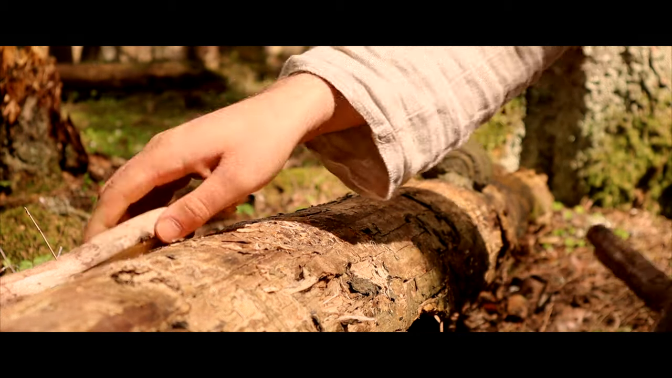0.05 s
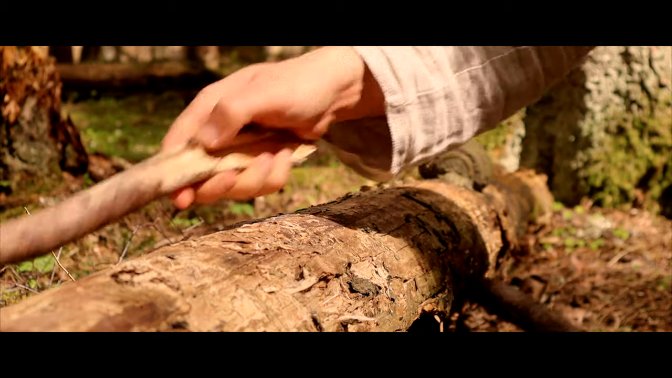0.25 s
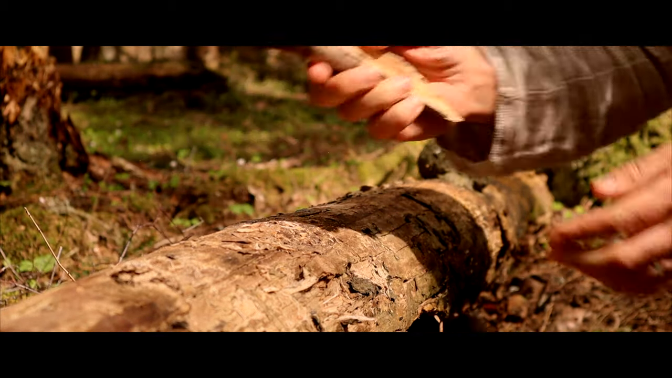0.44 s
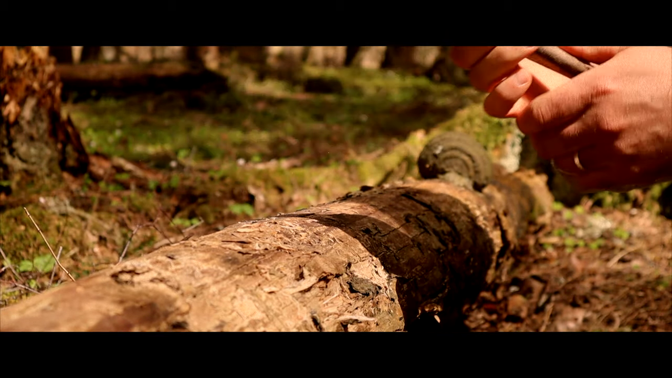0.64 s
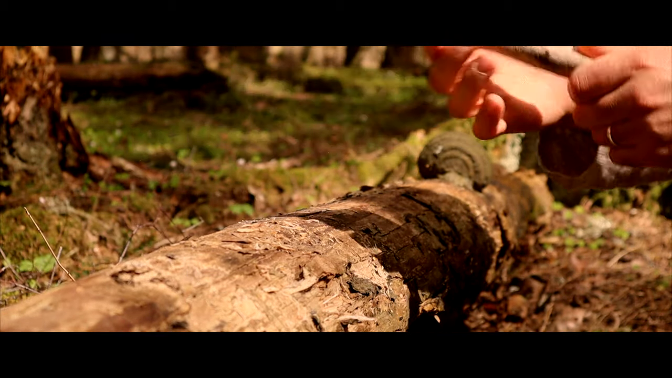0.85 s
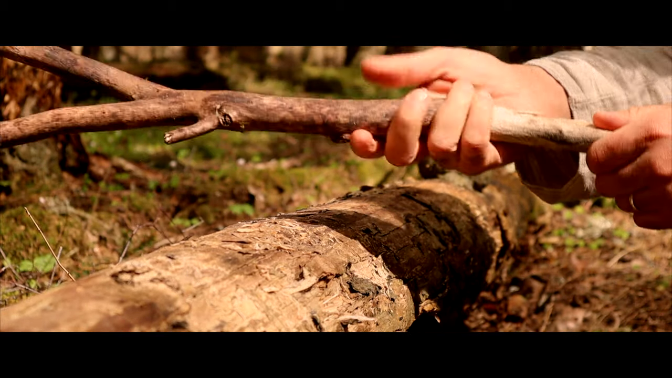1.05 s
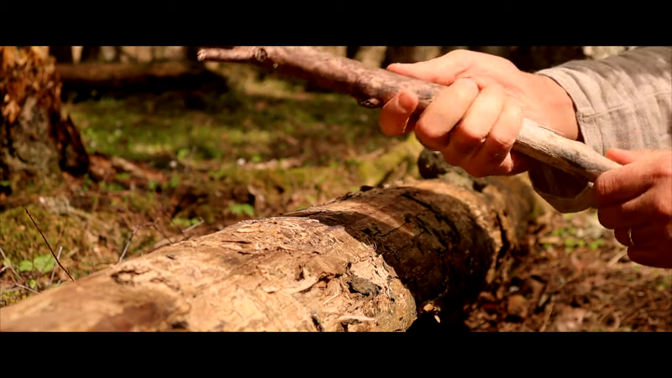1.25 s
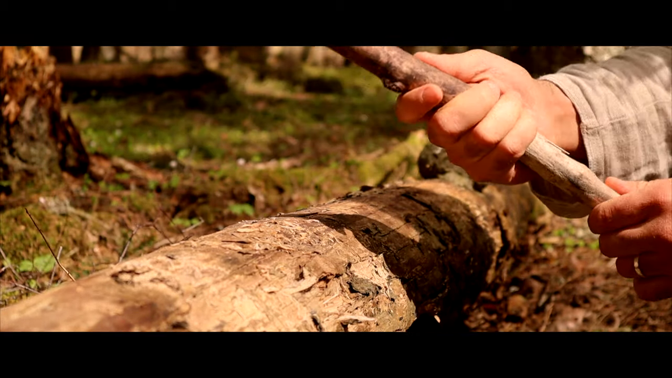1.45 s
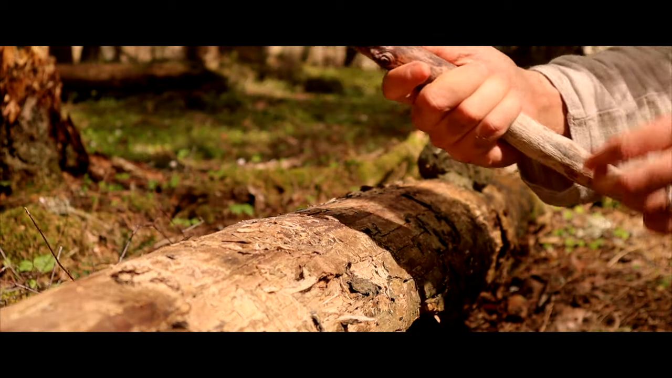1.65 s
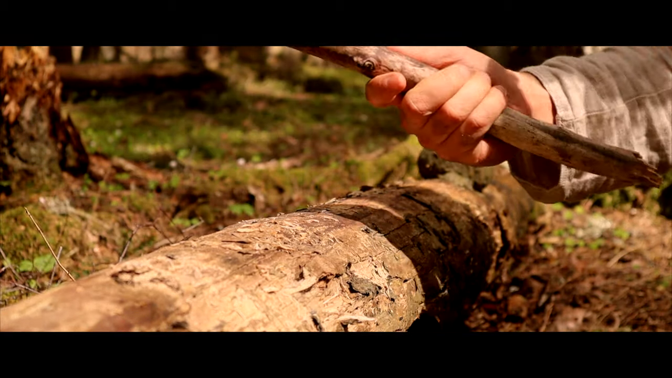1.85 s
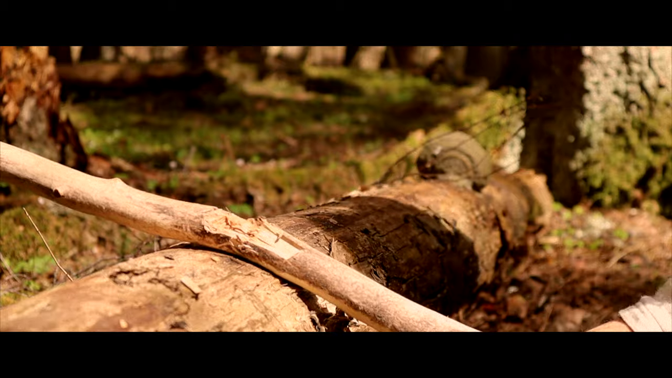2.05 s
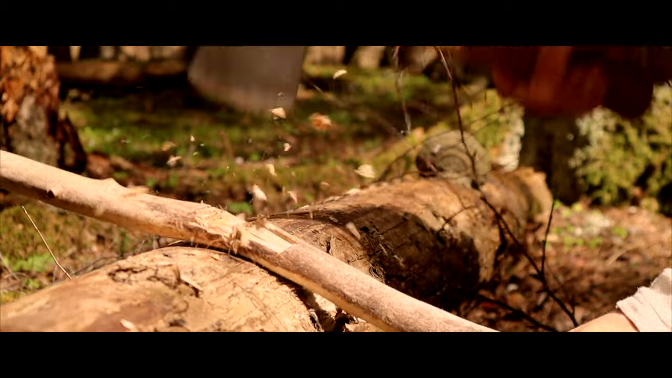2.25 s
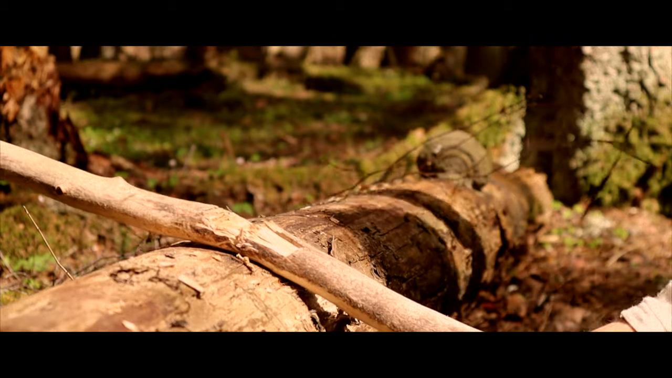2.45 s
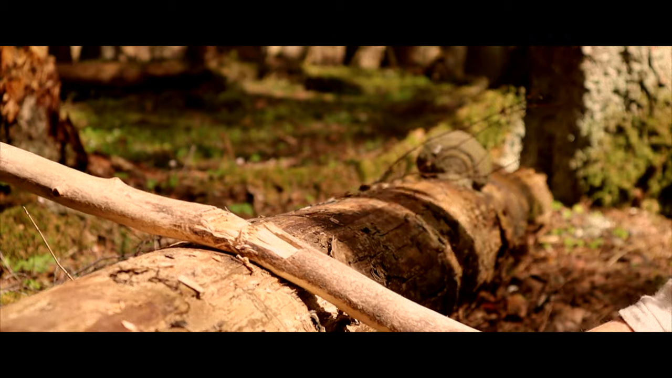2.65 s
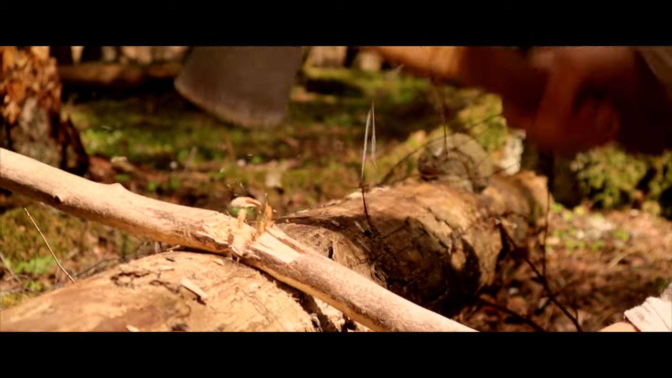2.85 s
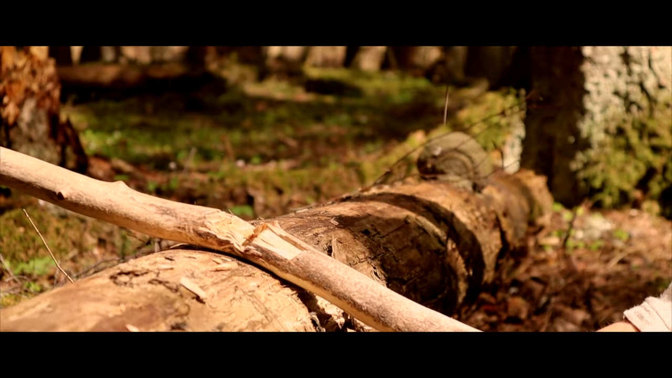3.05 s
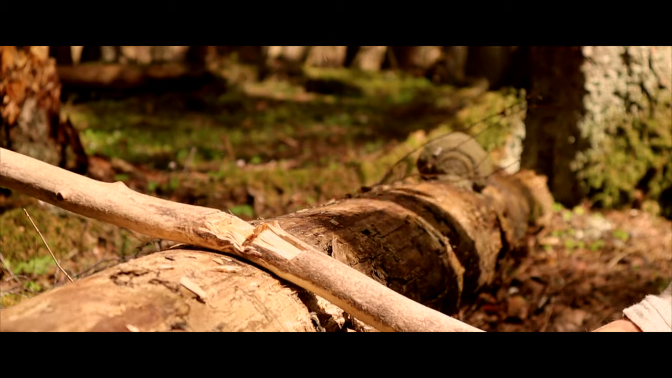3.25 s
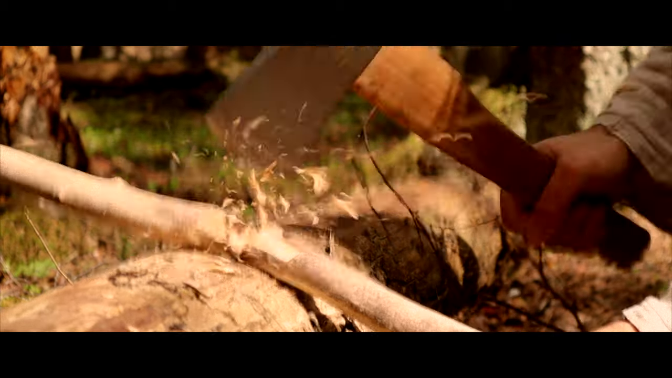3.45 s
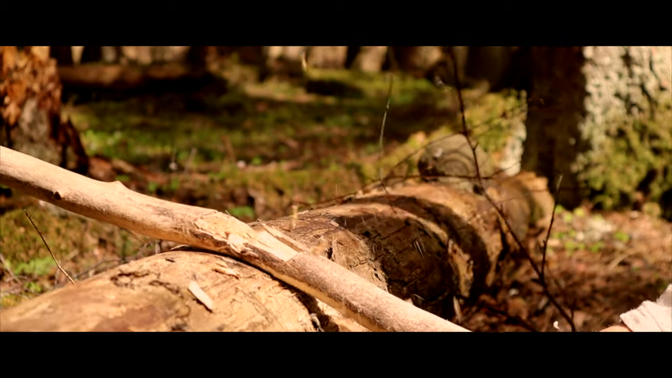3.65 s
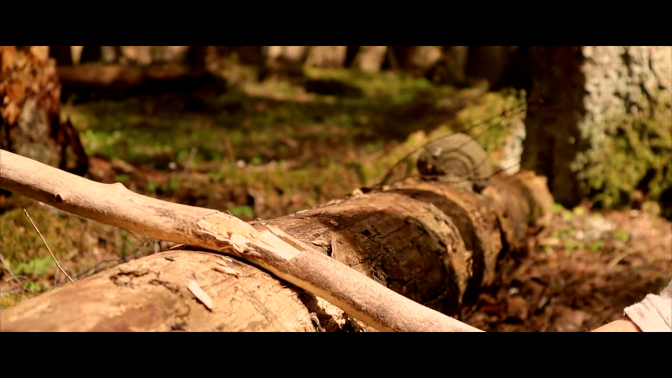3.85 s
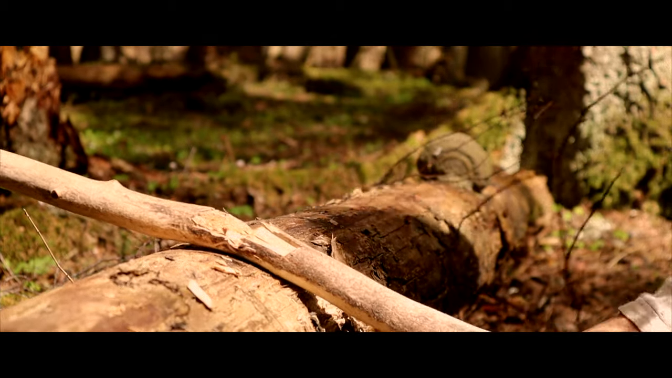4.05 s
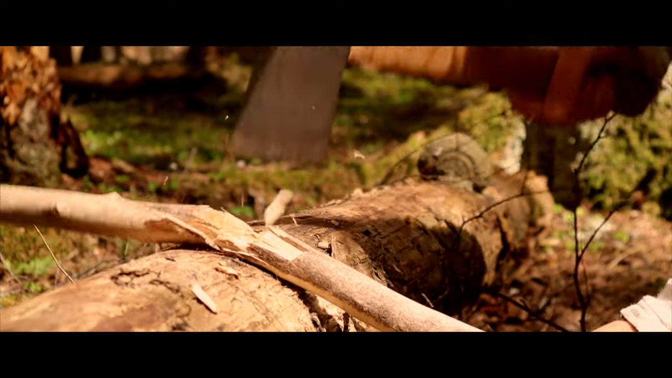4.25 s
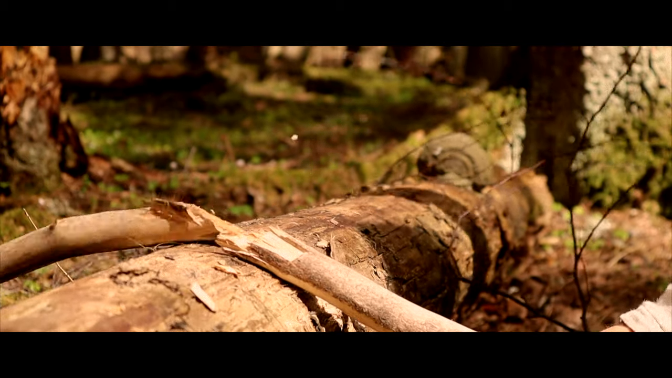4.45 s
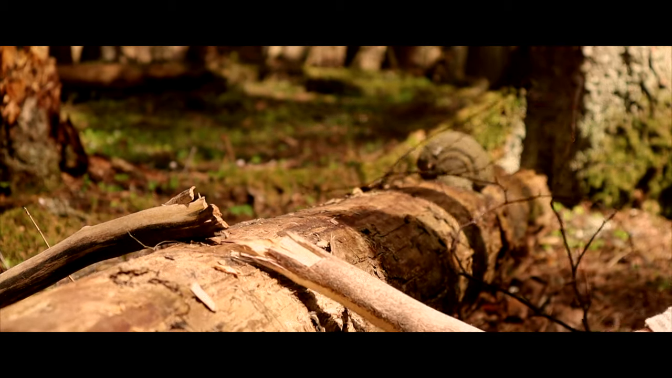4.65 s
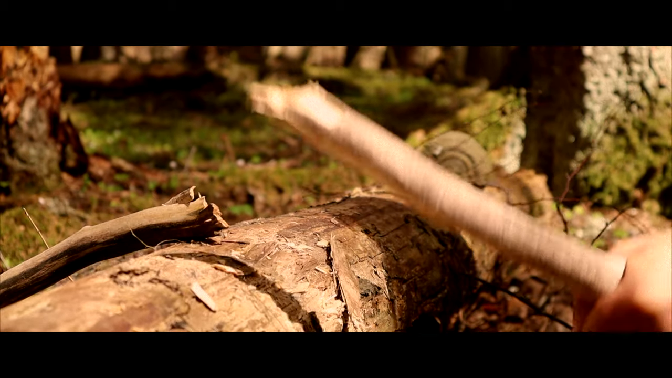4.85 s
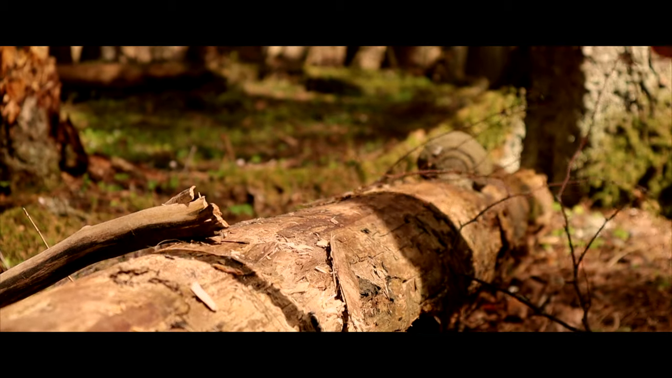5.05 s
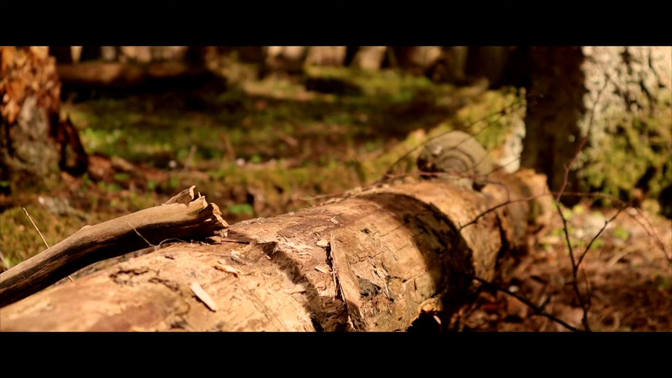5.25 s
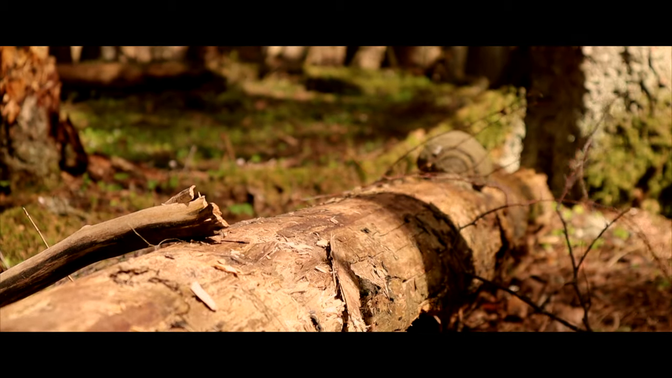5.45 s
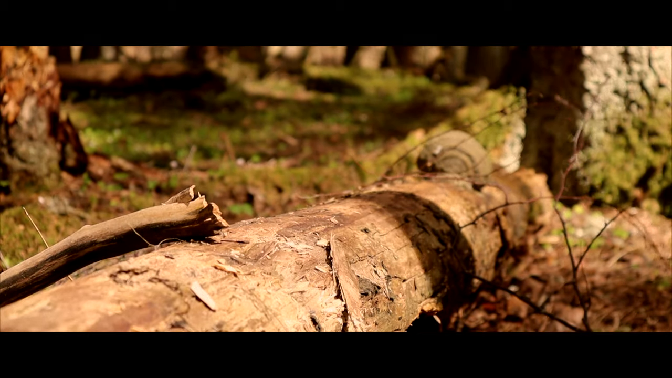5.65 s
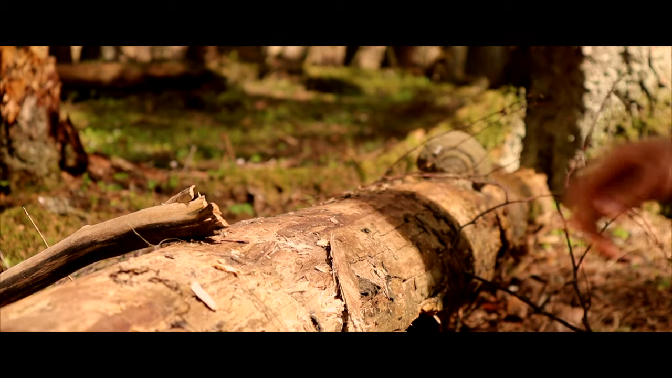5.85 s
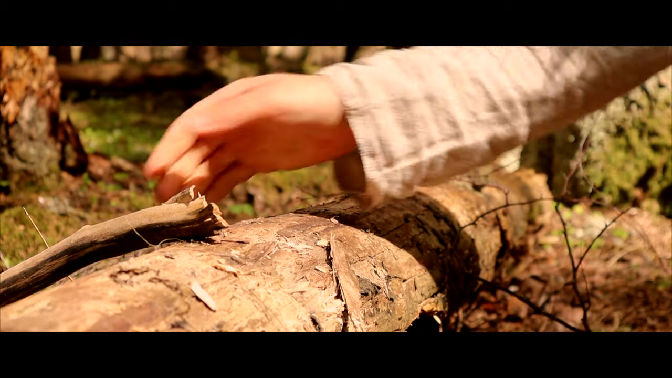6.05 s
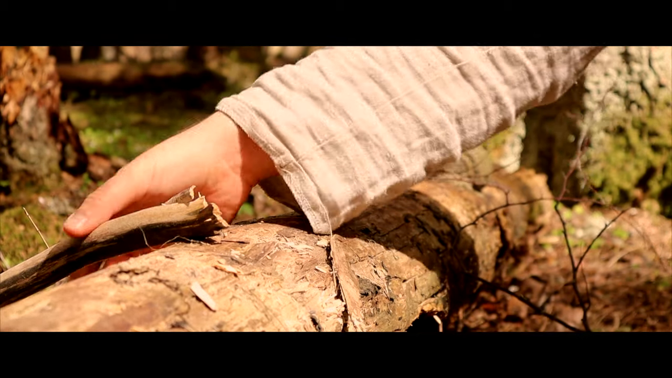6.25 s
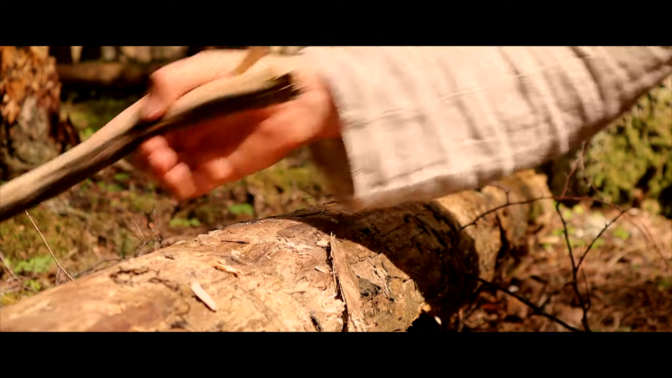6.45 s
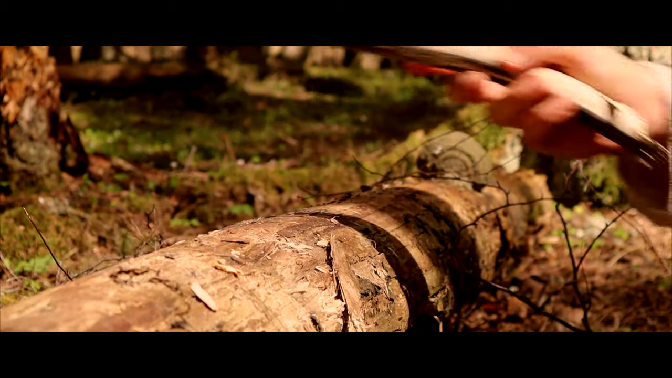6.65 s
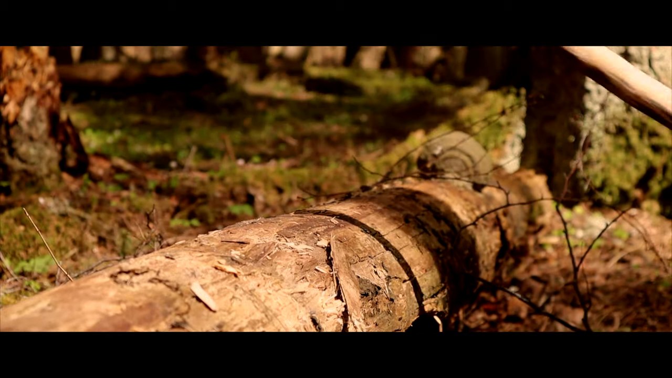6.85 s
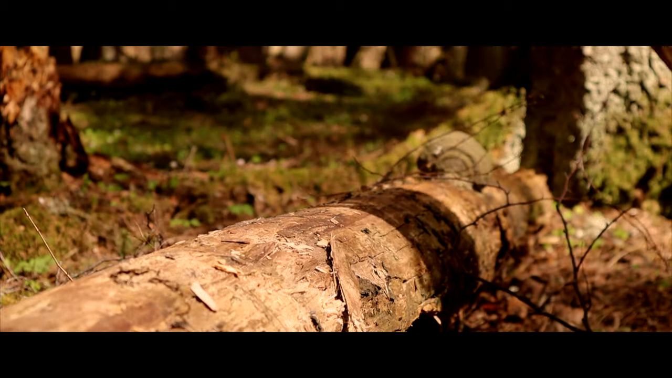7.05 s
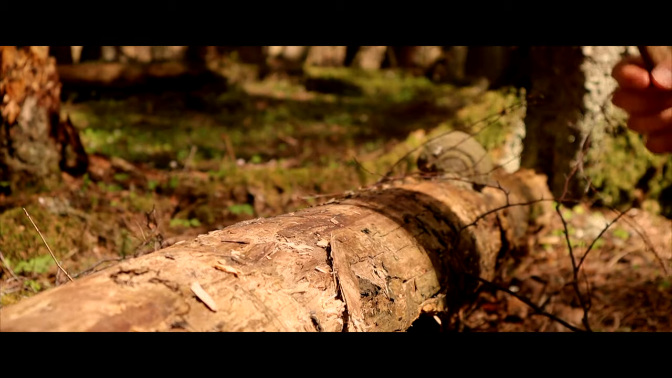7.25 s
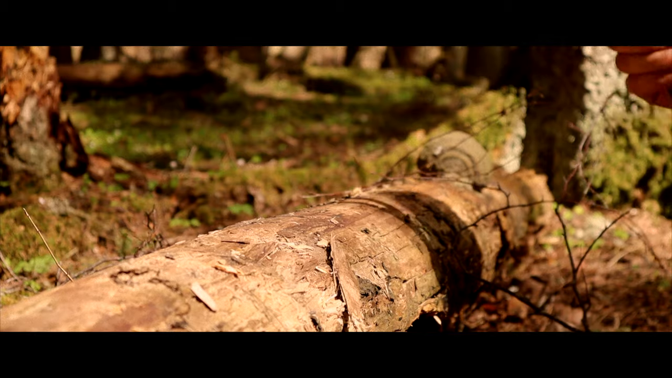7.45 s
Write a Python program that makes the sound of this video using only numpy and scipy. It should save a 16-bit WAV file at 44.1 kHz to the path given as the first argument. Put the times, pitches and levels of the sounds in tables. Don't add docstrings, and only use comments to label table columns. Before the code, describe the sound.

Four hard, evenly paced axe chops crack into a dry branch on a log, chips pattering, then the axe drops on forest soil.

```python
import sys
import numpy as np
from scipy import signal
from scipy.fft import rfft, irfft
from scipy.io import wavfile

SR = 44100
rng = np.random.default_rng(int(sys.argv[2]) if len(sys.argv) > 2 else 0)


def ratio_of_db(decibels):
    return 10 ** (np.asarray(decibels, float) / 20)


def inscribe(sig):
    pcm = np.round(np.clip(np.atleast_2d(sig).T, -1, 1) * 32767)
    wavfile.write(sys.argv[1], SR, pcm.astype(np.int16))


N = 331191
STEP = 64

# pitch in Hz, level in dB per Hz.
TREE_HUSH = [(30, -15), (100, 2.5), (250, -6.5), (600, 0), (1050, -5.5), (2200, -18.5), (2950, -17),
             (3250, -17), (3600, -17), (4300, -21), (5500, -30), (9000, -29.5), (15000, -38.5)]
# time in seconds, rumble in dB.
WIND = [(0, -71), (.35, -60), (.65, -77), (1.86, -72.5), (1.95, -44), (2.1, -52), (4.08, -58.5), (4.8, -53),
        (5.05, -63.5), (5.17, -49.5), (5.45, -69.5), (5.65, -58), (6.3, -56), (6.45, -53), (7.0, -46),
        (7.2, -50.5), (7.33, -54.5), (7.51, -56)]
# middle in seconds, half width in seconds, level in dB.
LEANS = [
    (.33, 0.32, -59.5),
    (1.97, 0.11, -61),
    (5.67, 0.23, -59),
    (7.33, 0.1, -67),
]
# pitch in Hz, level in dB per Hz.
RUB_COLOUR = [(300, -12.5), (800, -6), (1500, -4), (2700, -3.5), (4000, -6), (6000, -14.5)]
# start in seconds, length in seconds, dull part in dB,
# bright part in dB.
RUBS = [(0.026, 0.045, -47, -56.5), (0.149, 0.13, -51, -59.5), (0.303, 0.0047, -52, -45),
        (0.316, 0.15, -50.5, -61.5), (0.462, 0.06, -47.5, -50), (0.587, 0.021, -47.5, -50),
        (0.667, .016, -54, -62), (.72, 0.041, -59, -63.5), (0.89, 0.067, -69, -66), (1.1, 0.042, -74, -72),
        (4.364, 0.012, -48.5, -57.5), (4.406, 0.023, -50.5, -55.5), (4.464, 0.091, -62.5, -64),
        (4.57, 0.011, -53, -69), (4.624, 0.028, -57.5, -59), (4.865, .08, -59, -73.5),
        (4.951, 0.066, -50, -59), (5.048, 0.034, -48.5, -58.5), (5.112, 0.04, -48.5, -59),
        (5.606, .02, -52.5, -71), (5.89, 0.017, -61, -80), (5.975, 0.081, -55.5, -67),
        (6.096, 0.025, -54, -62), (6.238, 0.079, -54.5, -61), (5.7, 0.17, -68.5, -82),
        (7.476, 0.0201, -54.5, -63), (6.97, 0.0034, -56, -59), (7.231, 0.042, -55.5, -64),
        (7.319, 0.022, -48, -53), (7.39, 0.024, -58.5, -62), (2.884, .014, -52, -51), (3.5, .08, -54, -64),
        (3.935, .06, -57, -63), (4.18, .07, -53, -72), (6.225, .03, -53, -62), (6.3, .045, -60, -60),
        (6.82, .04, -62, -63)]
# end in seconds, rise in dB per
# second, dull part in dB, bright part in dB.
SLIDES = [
    (6.445, 352, -51, -57),
    (6.868, 170, -55, -61),
    (6.77, 39, -82, -70.5),
]
DEBRIS_DB = (-4.0, 1.5, 1.5, 0.5)
# time in seconds, peak in dB, ringing pitch in Hz,
# bright peak in dB.
TICKS = [(0.0672, -33, 3400, -47), (0.3075, -25.5, 1870, -45), (0.4608, -36, 3430, -59),
         (0.5989, -41, 2960, -43.5), (0.6658, -42.5, 2880, -44), (2.082, -36.5, 2370, -54),
         (2.115, -24, 3300, -50.5), (2.173, -25, 1030, -36), (2.211, -38, 1010, -56),
         (2.2787, -33, 1350, -62.5), (2.7706, -16.5, 3190, -29), (2.7805, -21, 2980, -31),
         (2.8271, -30, 1020, -45), (2.9203, -39.5, 3250, -43.5), (3.4095, -28, 2020, -31.5),
         (3.466, -22.5, 1450, -38), (3.4738, -21, 1050, -28.5), (3.527, -33, 1000, -45.5),
         (3.7887, -37, 2000, -68), (3.888, -37, 1830, -70), (3.9447, -34.5, 1970, -61),
         (4.038, -40.5, 3500, -51.5), (4.0812, -29.5, 2150, -34.5), (4.1465, -36.5, 1790, -50.5),
         (4.6156, -40, 1980, -45), (5.137, -35, 3230, -50.5), (5.5677, -24.5, 3105, -71),
         (5.5943, -29.5, 4530, -38), (6.445, -40, 2855, -62), (7.328, -40.5, 4180, -38)]
# time in seconds, bright peak in dB.
FLAKES_AND_CRUMBS = [(1.9196, -49), (1.9545, -54), (1.9927, -53), (2.0631, -51.5), (2.1524, -36), (2.1573, -37),
                     (2.1831, -41.5), (2.3152, -48.5), (2.4635, -51), (2.5192, -51.5), (2.577, -47), (2.5932, -49),
                     (2.6893, -50.5), (2.8352, -47.5), (2.8927, -50), (2.9144, -47.5), (3.0847, -45), (3.2204, -47),
                     (3.2708, -52.5), (3.5153, -46), (3.5421, -41.5), (3.5554, -46), (3.6479, -52), (3.7692, -42),
                     (3.8267, -51), (3.8622, -42.5), (3.9154, -39), (3.9239, -31), (4.0949, -44), (4.4169, -40),
                     (0.4993, -40), (0.5069, -42.5), (0.5938, -43), (1.1275, -55.5), (1.5162, -59), (4.4392, -39.5),
          (4.6255, -43.5), (5.0735, -44.5), (5.1584, -44), (5.6039, -48), (6.0245, -51), (6.3219, -48.5),
          (6.3359, -44.5), (6.432, -51), (6.4399, -52), (6.7733, -51.5), (6.9627, -40.5), (7.2109, -52.5),
          (7.3402, -45.5), (7.411, -53.5), (7.4776, -45)]
# time in seconds, peak in dB, pitch in Hz, seconds to fade
# by 60 dB.
KNOCKS = [(0.161, -36.5, 426, 0.05), (0.251, -37, 180, 0.021), (0.419, -34.5, 260, 0.023),
          (0.591, -44.5, 228, 0.056), (2.388, -33.5, 147, 0.043), (2.462, -31.5, 134, 0.024),
          (2.507, -38, 212, 0.047), (3.039, -31.5, 145, 0.038), (3.158, -41, 218, 0.048),
          (3.677, -37.5, 145, 0.045), (3.752, -33.5, 135, 0.034), (4.078, -32.5, 815, 0.023),
          (4.498, -46, 210, 0.034), (5.582, -31.5, 172, 0.073), (5.65, -25, 236, 0.02),
          (5.716, -42.5, 172, 0.041), (5.768, -44.5, 203, 0.037), (5.598, -35, 250, .02),
          (3.485, -33, 480, .025), (3.511, -36, 520, .02), (3.523, -36, 500, .02), (3.553, -35, 500, .025),
          (7.31, -46, 400, .04), (4.75, -48, 230, .04), (5.893, -37, 190, 0.047)]
# time in seconds, level in dB, ringing pitch in Hz, length in seconds,
# share of ringing (no unit).
CRUNCHES = [(0.304, -39, 1800, 0.018, 0.44), (2.118, -47, 1210, 0.027, .3),
            (2.772, -41.5, 2440, 0.036, 0.19), (3.411, -44, 2056, 0.011, 0.72),
            (3.924, -48, 1150, 0.018, 0.33), (4.4022, -29, 500, 0.0068, 0.56),
            (4.4015, -41.5, 2300, 0.009, 1.5), (4.415, -34.5, 1110, 0.0046, 0.23),
            (4.434, -48, 2850, 0.02, 0.25), (4.613, -50, 1940, 0.023, 3.5), (4.616, -50, 2880, 0.014, 2.1),
            (5.554, -30.5, 1050, 0.026, 0.33), (5.649, -45, 600, 0.017, 1.5), (6.424, -55, 3100, .03, 1.14),
            (2.93, -42.5, 1500, 0.012, 0.1), (4.26, -47.5, 1380, 0.015, .2),
            (1.803, -58.5, 1500, 0.0054, .3), (6.109, -46.5, 1317, 0.022, 0.57),
            (6.111, -54.5, 740, 0.025, 2.9), (6.959, -45.5, 2010, 0.0072, .1)]
# time in seconds, length in seconds, first pitch in Hz, last pitch in
# Hz, level in dB.
CHIRPS = [
    (1.52, .025, 4170, 3580, -62),
    (1.727, 0.013, 4440, 3600, -63),
    (1.738, .012, 3570, 4400, -66),
    (6.16, 0.0185, 4620, 3500, -59),
    (7.159, 0.03, 5000, 3730, -62.5),
]
# time in seconds, pitch in Hz, level in dB.
BIRD_VOICES = [
    [(5.71, 8320, -120), (5.73, 8180, -72), (5.76, 8400, -76.5), (5.78, 9620, -75.5), (5.797, 8900, -78.5),
     (5.828, 10000, -90.5), (5.875, 8340, -84), (5.92, 9230, -76), (5.97, 9150, -120)],
    [(5.71, 6580, -120), (5.75, 6630, -77), (5.77, 6800, -78), (5.805, 8240, -74), (5.83, 7860, -79.5),
     (5.855, 6730, -77.5), (5.907, 7960, -76.5), (5.95, 7470, -80), (5.97, 7360, -120)],
]
# time in seconds, pitch in Hz, level in dB.
WHISTLES = [
    [(2.036, 1750, -90), (2.043, 1850, -58), (2.055, 2910, -62), (2.068, 3350, -59), (2.09, 3100, -60),
     (2.11, 2700, -62), (2.118, 2500, -90)],
    [(1.98, 3400, -90), (1.99, 3220, -59), (2.005, 2800, -66), (2.015, 2600, -90)],
    [(1.565, 2980, -95), (1.59, 2800, -67), (1.615, 2450, -71), (1.645, 2040, -72), (1.66, 1950, -95)],
    [(1.745, 4300, -95), (1.76, 4750, -74), (1.8, 4850, -77), (1.815, 4800, -95)],
    [(1.805, 3800, -95), (1.82, 3550, -71), (1.84, 2800, -71), (1.855, 2550, -95)],
    [(1.6, 3450, -95), (1.618, 3350, -62), (1.635, 3250, -74), (1.657, 3300, -65), (1.68, 3400, -70),
     (1.7, 3350, -95)],
]
# time in seconds, force in dB, wood pitch factor (no unit), splinters in dB, rebound
# delay in seconds.
CHOPS = [
    (2.1653, 2.5, 1.08, -11.5, .0085),
    (2.8164, 1.5, 1.0, -5.5, .011),
    (3.4555, 1.5, .97, -7, .0185),
    (4.1563, 0.5, 1.01, -10, .009),
]
# bite in seconds, three branch tones in dB, dB, dB, dying sound
# in dB.
GRIPS = [
    (.00085, 0, 0, 6, 0),
    (.0008, -8, 1.5, 12, 1.5),
    (.00095, 0, -2, 9, 0),
    (.001, 9, -7, -8, 0),
]
# four high tones in dB, dB, dB, dB, the log in dB.
EDGES = [
    (0, 0, 0, 0, 0),
    (0, -5, 2, -2, 4),
    (0, 2, 7, 4, 0),
    (3, 5, 0, 2, -1),
]
ADJUSTED_TONES = (2, 3, 4, 5, 6, 7, 8, 1)
# pitch in Hz, level in dB, seconds to fade by 60 dB.
WOOD_TONES = [(192, -19, .12), (246, -8, 0.043), (500, -14.5, 0.016), (660, 0, 0.0081), (876, -19.5, 0.018),
              (1180, -14, .015), (1550, -18, .02), (2350, -15.5, 0.018), (3250, -13, .015)]
# pitch in Hz, level in dB per Hz.
TEAR_COLOUR = [(530, -24.5), (900, -5.5), (1620, -7.5), (3470, -8), (6110, -15.5), (6720, -14.5),
               (13500, -25.5), (16000, -30)]
# pitch in Hz, level in dB per band, seconds to fade by 60 dB.
DYING_BANDS = [(43.6, -30, 0.97), (125, -39, 0.9), (228, -28, 0.33), (480, -27, 0.14), (965, -34.5, 0.052),
               (1900, -42, .15), (3400, -47, .3), (7600, -56, 0.12)]
# delay in seconds, level in dB, pitch in Hz, seconds
# to fade by 60 dB.
THUMPS = [
    (.017, -23, 175, .05),
    (.048, -25, 85, .12),
    (.066, -30, 160, .05),
    (.124, -27, 75, .12),
]
# time in seconds, peak in dB, pitch in Hz, seconds to fade
# by 60 dB.
PINGS = [(3.4097, -18.5, 2020, 0.018), (3.4097, -22.5, 3600, .012), (3.417, -40.5, 3720, .03),
         (2.2105, -33, 1000, .012), (2.264, -38.5, 1300, .012), (5.557, -30, 2500, .02),
         (2.919, -40, 3160, .015), (2.963, -44.5, 900, 0.017), (3.122, -46.5, 1700, .015),
         (4.2667, -42, 1500, .012), (4.8635, -50, 3300, .012), (4.897, -47.5, 3400, .012),
         (4.907, -48, 2500, .012), (4.924, -51, 9800, .006), (4.931, -49, 5800, .008),
         (5.056, -42, 3100, 0.021), (5.064, -45, 2480, .015), (5.07, -44, 3400, .015),
         (5.092, -43, 2400, .015), (5.113, -43, 2320, 0.016), (5.121, -42, 3100, .015),
         (5.146, -41, 3500, .012), (5.209, -53.5, 3000, .01), (5.22, -53.5, 3400, .01),
         (5.653, -41.5, 2200, .02), (6.2133, -51, 3080, .012), (6.2262, -50, 2880, .015),
         (6.2366, -46, 2840, .02), (6.2446, -47, 2980, .02), (6.4013, -49, 2780, .012),
         (6.8281, -51, 2460, .015), (6.845, -50, 2900, .015), (7.1381, -52.5, 3710, .012),
         (7.2095, -45, 2920, .015), (7.2308, -48.5, 3100, .015), (7.3157, -42, 2790, .015),
         (7.357, -40.5, 3340, 0.013), (7.3895, -51.5, 3360, .012), (7.4633, -46.5, 2920, .012)]
# time in seconds, peak in dB.
SPECKS = [(2.8873, -35), (2.8964, -34), (2.9394, -44), (2.9614, -43), (3.7683, -31), (3.8054, -39),
          (3.8472, -41), (3.895, -33), (3.9504, -43), (3.9744, -44), (6.3274, -36), (6.3494, -48),
          (6.4078, -38), (7.1382, -48), (7.23, -42), (7.3567, -35), (7.3674, -37), (7.4629, -39)]
# time in seconds, level in dB.
LANDINGS = [
    (5.5559, -27.5),
    (5.5571, -19),
    (5.569, -37),
]
# pitch in Hz, level in dB, seconds to fade by 60 dB.
AXE_TONES = [(600, -17, 0.03), (920, -9, 0.05), (1384, -15, 0.07), (1750, -18, .07), (1950, 0, 0.03),
             (3198, -11, 0.11), (3230, -22.5, 0.23), (4510, -36.5, 0.3)]
# time in seconds, level in dB, pitch in Hz, seconds to fade by 60 dB.
HANDLE_HUM = (5.566, -41, 477, .55)


def in_time(rows):
    s, *columns = np.transpose(rows)
    return [np.interp(np.arange(N) / SR, s, column) for column in columns]


def bandpass(x, low_hz, high_hz, order=2):
    sos = signal.butter(order, [low_hz, min(high_hz, .45 * SR)], "band", fs=SR, output="sos")
    return signal.sosfilt(sos, x)


def band(x, low_hz, high_hz, order=2):
    y = bandpass(x, low_hz, high_hz, order)
    return y / np.std(y)


def coloured(white, points):
    hz = np.maximum(np.fft.rfftfreq(len(white), 1 / SR), 1)
    table_hz, table_db = np.transpose(points)
    gain = ratio_of_db(np.interp(np.log(hz), np.log(table_hz), table_db))
    y = irfft(rfft(white) * gain, len(white))
    return y / np.std(y)


def drift(rate):
    knots_per_s = 400
    knots = rng.standard_normal(int(N / SR * knots_per_s))
    r = np.exp(-2 * np.pi * rate / knots_per_s)
    slow = signal.lfilter([1], [1, -2 * r, r * r], np.tile(knots, 2))[len(knots):]
    return np.interp(np.arange(N) / SR * knots_per_s, np.arange(len(slow)), slow / np.std(slow))


def ring(hz, t60, size):
    t = np.arange(size) / SR
    return np.sin(2 * np.pi * hz * t) * ratio_of_db(-60 * t / max(t60, .002))


def glide(hz):
    return np.sin(2 * np.pi * np.cumsum(hz) / SR)


def add(out, s, sound):
    i = round(s * SR)
    out[i:i + len(sound)] += sound[:N - i]


def swell(start_s, end_s, db, rise_db_s, fall_db_s):
    t = np.arange(0, N, STEP) / SR
    before = rise_db_s * np.maximum(start_s - t, 0)
    after = fall_db_s * np.maximum(t - end_s, 0)
    return ratio_of_db(db - before - after) ** 2


def hump(middle_s, width_s, db):
    t = np.arange(0, N, STEP) / SR
    return ratio_of_db(db) ** 2 * np.exp(-4 * ((t - middle_s) / width_s) ** 2)


def level_db(power):
    return np.interp(np.arange(N) / STEP, np.arange(len(power)), 10 * np.log10(power + 1e-14))


def heaves():
    return sum(hump(chop[0] + .36, 0.23, 0) for chop in CHOPS)


def forest_hush():
    return ratio_of_db(-64.0 + 0.65 * drift(2.8)) * coloured(rng.standard_normal(N), TREE_HUSH)


def chorus():
    voices = [glide(hz + 110 * drift(45)) * ratio_of_db(4.5 * drift(30)) for hz in (2880, 2970, 3450, 3550)]
    return ratio_of_db(-79.5 - .8 * np.arange(N) / SR) * sum(voices)


def rumble():
    wind = ratio_of_db(in_time(WIND)[0][::STEP]) ** 2
    loudness_db = level_db(wind + ratio_of_db(-50) ** 2 * heaves())
    return band(rng.standard_normal(N), 23, 70) * ratio_of_db(loudness_db + 1.5 * drift(8.4) - 2.5)


def creak():
    leaning = sum(hump(*row) for row in LEANS)
    loudness_db = level_db(ratio_of_db(-75) ** 2 + ratio_of_db(-53.5) ** 2 * heaves() + leaning)
    return band(rng.standard_normal(N), 100, 300) * ratio_of_db(loudness_db + 3 * drift(15))


def crackle(rub_db, low_hz, high_hz):
    pops_per_s, ring_cycles = 90, 13
    happens = rng.random(N) < pops_per_s / SR
    height = ratio_of_db(3.2 * np.minimum(rng.exponential(1, N), 3))
    pops = happens * height * ratio_of_db(rub_db + 3.5)
    dealt = rng.integers(0, 6, N)
    out = np.zeros(N)
    for k, hz in enumerate(np.geomspace(low_hz, high_hz, 6)):
        out += signal.oaconvolve(pops * (dealt == k), ring(hz, ring_cycles / hz, 300))[:N]
    return out


def rubbing():
    shapes = []
    for s, length_s, _, _ in RUBS:
        rise_db_s = 25.5 / (length_s + 0.019)
        shapes.append(swell(s, s + length_s, 0, rise_db_s, 0.65 * rise_db_s))
    for s, rise_db_s, _, _ in SLIDES:
        shapes.append(swell(s, s, 0, rise_db_s, 2470))
    levels_db = np.array(RUBS + SLIDES)[:, 2:].T
    dull_rubs, bright_rubs = ratio_of_db(levels_db) ** 2 @ np.array(shapes)
    work = swell(1.92, 4.7, 0, 980, 300) * ratio_of_db(4.0 * drift(12)[::STEP])
    debris = sum(swell(chop[0], chop[0], -52 + db, 3000, 41.5) for chop, db in zip(CHOPS, DEBRIS_DB))
    still_db = -69.5
    dull_db = level_db(ratio_of_db(still_db) ** 2 + ratio_of_db(-61) ** 2 * work + debris + dull_rubs)
    bright_db = level_db(ratio_of_db(-83.5) ** 2 + ratio_of_db(-69) ** 2 * work + ratio_of_db(-14.5) ** 2 * debris + bright_rubs)
    clumps = 1.8 * drift(40)
    grains = rng.standard_normal(N) * ratio_of_db(1.8 * rng.exponential(1, N))
    dull = coloured(grains, RUB_COLOUR + [(9000, -36.0)])
    dull *= ratio_of_db(dull_db + clumps + 2.1 * drift(60) - 5.5)
    bright = band(grains, 4100, 13000) * ratio_of_db(bright_db + clumps + 1.8 * drift(60) - 3.5)
    active_db = np.where(dull_db > still_db + 2, dull_db, -120)
    pops = crackle(active_db, 1900, 4700) + crackle(bright_db + 0.5, 5000, 10500)
    return dull + bright + pops


def ticks():
    out, t = np.zeros(N), np.arange(900) / SR
    small = FLAKES_AND_CRUMBS
    pieces = list(TICKS)
    for (s, db), (a, b) in zip(small, rng.standard_normal((len(small), 2))):
        pieces.append((s, db - 1.5 + 3 * a, 3300 * np.exp(.12 * b), db))
    sprays = rng.standard_normal((len(pieces), len(t))) * ratio_of_db(-60 * t / 0.011)
    tops = bandpass(sprays, 5500, 13000)
    mids = bandpass(sprays, 900, 4500)
    for (s, db, hz, top_db), top, mid in zip(pieces, tops, mids):
        body = ring(hz, 0.0097, len(t)) + 1.8 * mid
        add(out, s + .0001, ratio_of_db(db - 2.5) * body + ratio_of_db(top_db + 6) * top)
    return out


def knocks():
    out = np.zeros(N)
    for s, db, hz, t60 in KNOCKS:
        overtone = ring(2.42 * hz, 0.46 * t60, 4400)
        add(out, s + 0.0046, ratio_of_db(db - 2) * (ring(hz, t60, 4400) + 0.65 * overtone))
    return out


def crunches():
    out, t = np.zeros(N), np.arange(3000) / SR
    size = (len(CRUNCHES), len(t))
    cracks = rng.standard_normal(size) * ratio_of_db(2.5 * rng.exponential(1, size))
    for (s, db, hz, length_s, tone), row in zip(CRUNCHES, cracks):
        fade = np.exp(-.7 * t / length_s) / (1 + (t / length_s) ** 2.8)
        row = row * fade * np.minimum(t / 0.00083, 1)
        low = np.clip(1 - hz / 3800, 0, 1)
        broad = low * band(row, 320, 1500) + (1 - low) * band(row, 1600, 3600, order=3)
        piece = np.convolve(row, ring(hz, .025, len(t)))[:len(t)]
        add(out, s, ratio_of_db(db - 9) * (broad + tone * piece / np.std(piece)))
    return out


def birds():
    out = np.zeros(N)
    for s, length_s, from_hz, to_hz, db in CHIRPS:
        hz = np.linspace(from_hz, to_hz, round(length_s * SR))
        add(out, s, ratio_of_db(db) * np.hanning(len(hz)) * glide(hz))
    for rows in BIRD_VOICES:
        hz, db = in_time(rows)
        out += ratio_of_db(db + 3 * drift(40)) * glide(hz)
    return out


def whistles():
    out, flutter = np.zeros(N), ratio_of_db(3.0 * drift(50) - 2.5)
    for rows in WHISTLES:
        s, hz, db = np.transpose(rows)
        t = np.arange(s[0], s[-1], 1 / SR)
        add(out, s[0], ratio_of_db(np.interp(t, s, db)) * glide(np.interp(t, s, hz)))
    return out * flutter


def bites():
    out, t = np.zeros(N), np.arange(SR // 2) / SR
    for (s, force_db, *_), (bite_s, *_) in zip(CHOPS, GRIPS):
        add(out, s - .0006, ratio_of_db(-10.0) * np.linspace(0, 1, 26) ** 2.0)
        push = np.sin(np.pi * np.minimum(t / bite_s, 1)) ** .7
        add(out, s, -ratio_of_db(force_db + 1.5) * push)
    return out


def struck_wood():
    out, size = np.zeros(N), SR // 2
    contact = signal.windows.hann(13) / 6
    for (s, force_db, pitch, _, rebound_s), (bite_s, *branch_db, _), edge_db in zip(CHOPS, GRIPS, EDGES):
        extra_db = dict(zip(ADJUSTED_TONES, [*branch_db, *edge_db]))
        for k, (hz, db, t60) in enumerate(WOOD_TONES):
            tone = np.convolve(ratio_of_db(db + extra_db.get(k, 0)) * ring(hz * pitch, t60, size), contact)
            lead_s = 0.00012 if hz < 350 else 0
            add(out, s + bite_s - lead_s, ratio_of_db(force_db) * tone)
            add(out, s + rebound_s, ratio_of_db(-15.5) * tone)
    return out


def tearing():
    out, t = np.zeros(N), np.arange(SR // 2) / SR
    fibres = coloured(rng.standard_normal(N) * ratio_of_db(3.0 * rng.exponential(1, N)), TEAR_COLOUR)
    for s, _, _, tear_db, _ in CHOPS:
        i = round(s * SR)
        length_s = 0.0037 + .0002 * (tear_db + 8.5)
        shape = np.minimum(t / 0.00058, 1) / (1 + (t / length_s) ** 4.3)
        add(out, s, ratio_of_db(tear_db - 3.5) * shape * fibres[i:i + len(t)])
    return out


def dying_wood():
    out, t = np.zeros(N), np.arange(SR // 2) / SR
    hums = [band(rng.standard_normal(N), hz / 1.41, hz * 1.3) for hz, _, _ in DYING_BANDS]
    rattle = ratio_of_db(1.5 * drift(22))
    hop = ratio_of_db(-53) * np.exp(-((t - .113) / .022) ** 2)
    for (s, *_), (*_, tail_db) in zip(CHOPS, GRIPS):
        here = slice(round(s * SR), round(s * SR) + len(t))
        tail = hop * rattle[here] * (hums[3] + hums[4])[here]
        for hum, (hz, db, t60) in zip(hums, DYING_BANDS):
            build_up = np.minimum(t * hz / 2.4, 1) ** 3
            tail += hum[here] * ratio_of_db(db - 60 * t / t60) * build_up
        add(out, s, np.minimum(t / .004, 1) * rattle[here] * ratio_of_db(tail_db) * tail)
    return out


def thumps():
    out, soft = np.zeros(N), signal.windows.hann(200) / 100
    for (s, force_db, *_), chance in zip(CHOPS, rng.standard_normal((len(CHOPS), len(THUMPS)))):
        for (delay_s, db, hz, t60), c in zip(THUMPS, chance):
            thump = np.convolve(ring(hz * (1 + .04 * c), t60, 9000), soft)
            add(out, s + delay_s, ratio_of_db(force_db + db + 1.0 * c) * thump)
    return out


def pings():
    out = np.zeros(N)
    for (s, db, hz, t60), rough in zip(PINGS, rng.standard_normal((len(PINGS), 60))):
        snap = .25 * rough * np.exp(-np.arange(60) / 18.0)
        snap[0] += 1
        tones = ring(hz, t60, 1500) + .6 * ring(1.3 * hz, .6 * t60, 1500)
        add(out, s, ratio_of_db(db - 3.5) * np.convolve(snap, tones))
    return out


def specks():
    out = np.zeros(N)
    sprays = rng.standard_normal((len(SPECKS), 300)) * ratio_of_db(-60 * np.arange(300) / SR / .005)
    for (s, db), spray in zip(SPECKS, bandpass(sprays, 2500, 15500)):
        add(out, s, ratio_of_db(db - 3) * spray)
    return out


def axe_drop():
    out, size = np.zeros(N), 15000
    chances_db = rng.normal(0, 2, (len(LANDINGS), len(AXE_TONES)))
    for (s, db), row in zip(LANDINGS, chances_db):
        for (hz, tone_db, t60), chance_db in zip(AXE_TONES, row):
            add(out, s, ratio_of_db(db + tone_db + chance_db) * ring(hz, t60, size))
    s, db, hz, t60 = HANDLE_HUM
    add(out, s, ratio_of_db(db) * ring(hz, t60, size) * np.minimum(np.arange(size) / 400, 1))
    return signal.sosfilt(signal.butter(2, 5500, fs=SR, output="sos"), out)


def scene():
    surroundings = forest_hush() + chorus() + birds() + whistles()
    handling = rumble() + creak() + rubbing() + ticks() + knocks() + crunches()
    blows = bites() + struck_wood() + tearing() + dying_wood() + thumps()
    return (surroundings + handling + blows + pings() + specks() + axe_drop())[None]


def low_pass(x):
    return signal.sosfilt(signal.butter(12, 16290, fs=SR, output="sos"), x)


def record(dry):
    peak_hz, width_hz, lift = 3300, 780, 0.8
    r = np.exp(-np.pi * width_hz / SR)
    w = 2 * np.pi * peak_hz / SR
    opening = signal.lfilter(np.array([1, 0, -1]) * (1 - r * r) / 2, [1, -2 * r * np.cos(w), r * r], dry)
    overloaded = np.clip(dry + lift * opening, -1, 1)
    return low_pass(overloaded)


dry = scene()
out = record(dry)
inscribe(out)
```